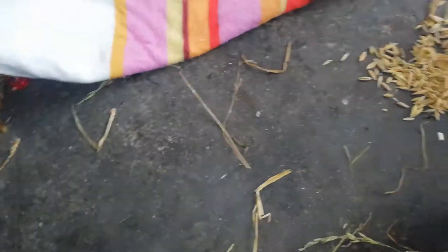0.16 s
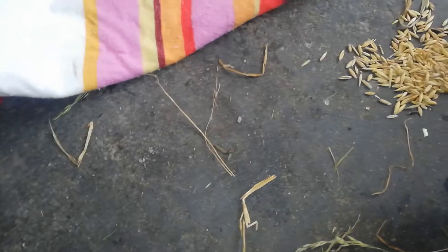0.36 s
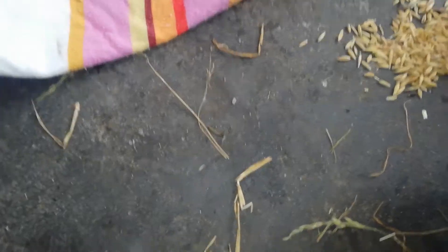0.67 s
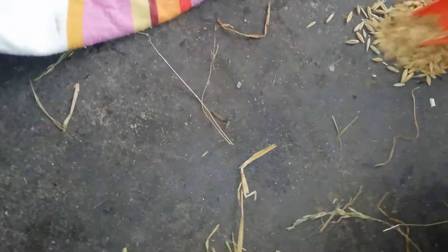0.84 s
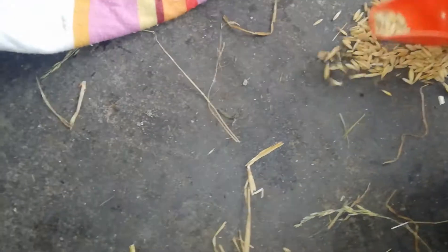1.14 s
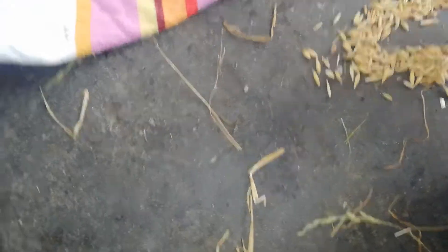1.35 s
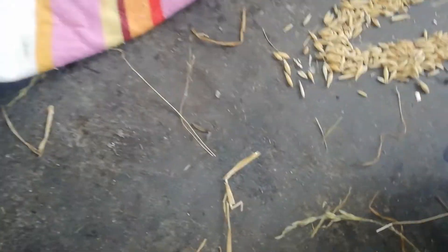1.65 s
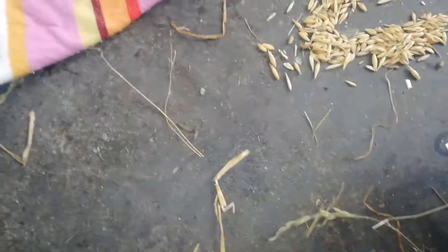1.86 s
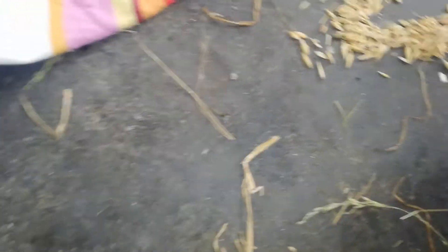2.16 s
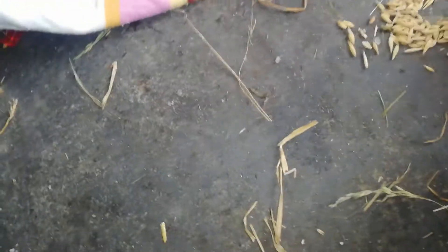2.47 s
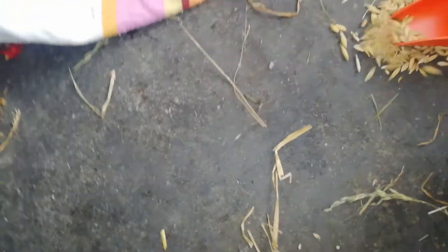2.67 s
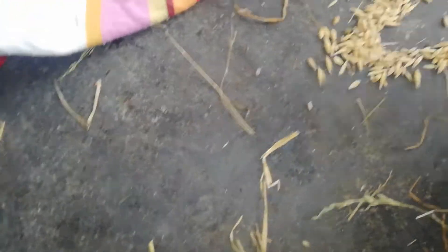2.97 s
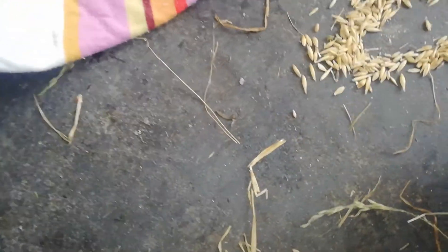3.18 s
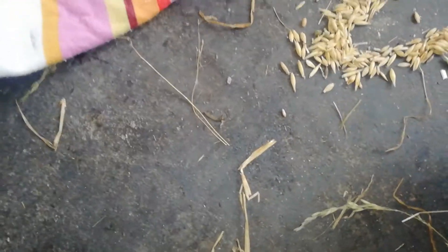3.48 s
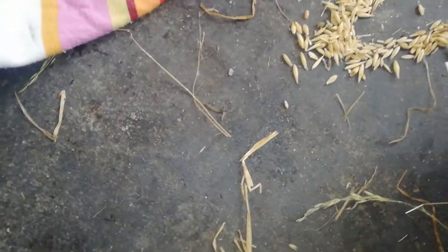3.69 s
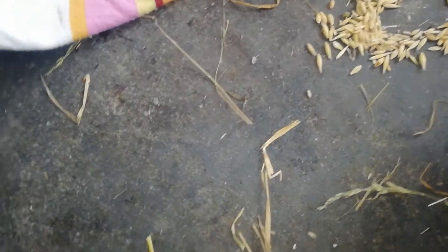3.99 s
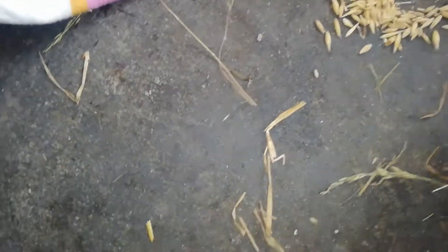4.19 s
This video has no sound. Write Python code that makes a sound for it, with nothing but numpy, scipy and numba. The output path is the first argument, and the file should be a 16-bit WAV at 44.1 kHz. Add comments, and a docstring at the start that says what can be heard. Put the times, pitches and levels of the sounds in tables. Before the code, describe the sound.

Close stereo phone pickup in a small farm shed. A plastic scoop taps the concrete, then drags through spilled grain in a bright, gritty scrape. Husks rustle and single kernels tick and patter down. A shorter, lower-bodied scrape follows, then more rustling, one sharp kernel click, and a cluster of hard hollow knocks near the end. Quiet hiss and faint rumble lie beneath.

```python
"""Scooping spilled grain off concrete

A plastic scoop scrapes spilled grain off a concrete shed floor, close to a phone with two microphone ports.
The rim grinds over grit in two strokes, made of thousands of tiny random contacts given a colour.
Husks rustle against the scoop, kernels tick and fall in two short showers: bursts of the same contacts.
The scoop knocks on the floor with a crack and ringing tones; filtered noise gives a faint tail and a rumble."""
import sys
import numpy as np
from scipy import signal
from scipy.fft import rfft, irfft, next_fast_len
from scipy.io import wavfile
from scipy.ndimage import uniform_filter1d
from numba import njit

SR = 44100
rng = np.random.default_rng(int(sys.argv[2]) if len(sys.argv) > 2 else 0)


def output_pcm(signal):
    """Save a mono or channel-first signal as 16-bit PCM at the path in sys.argv[1].

    Samples are clipped to [-1, 1] before scaling.
    """
    pcm = np.clip(np.atleast_2d(signal).T, -1, 1) * 32767
    wavfile.write(sys.argv[1], SR, np.round(pcm).astype(np.int16))


N = 190875
TIME = np.arange(N) / SR  # seconds

# The rim dragged over concrete, one row a stroke: start [t/s], time to full pressure [t/s], lift [t/s],
# relative level [level/dB], extra treble [level/dB], sag of the pressure [dB/s; negative grows]
STROKES = [(0.596, 0.093, 0.9285, -38, 3.5, 19.5), (2.308, 0.0073, 2.593, -41, 2.5, -2)]
# Grain shifting in and around the scoop, one row a movement: peak [t/s], rise [t/s], fall [t/s],
# relative levels of husks, hollow brushing and floor rubbing [level/dB each],
# left minus right [level/dB], resonance of the scoop [f/Hz]
RUSTLES = [ (0.02, 0.33, 0.33, -50, -55, -55, -2.5, 3400), (0.513, 0.04, 0.04, -56, -72, -75, 0, 3400),
           (0.985, 0.056, 0.26, -40, -54, -55.5, 1, 3400), (1.115, 0.11, 0.047, -44.5, -72, -79, -1, 3400),
           (1.375, 0.16, 0.14, -36.5, -44.5, -54.5, 1, 3430),
           (1.495, 0.22, 0.04, -55.5, -55, -55, -3, 3450),
           (1.755, 0.11, 0.21, -55.5, -53.5, -60.5, -10, 4300),
           (1.87, 0.14, 0.069, -37.5, -55, -68, -8.5, 3960),
           (2.04, 0.066, 0.25, -56.5, -59, -59.5, 0, 4200),
           (2.155, 0.15, 0.14, -51.5, -57, -63.5, -3, 4360), (2.645, 0.1, 0.18, -36.5, -63, -68, 1, 3200),
           (2.775, 0.09, 0.2, -48.5, -61, -74, -1, 3220), (3.092, 0.12, 0.13, -42.5, -42, -78, -7, 3430),
           (3.23, 0.19, 0.14, -49.5, -64, -58, -2.5, 3450), (3.415, 0.25, 0.085, -45, -57, -87, -12, 3400),
           (3.89, 0.25, 0.11, -58.5, -78, -62, -1, 3450), (4.075, 0.045, 0.25, -47, -57, -53, 2, 3460), ]
# Colour of a kernel's click: [f/Hz], [level/dB]
KERNEL = [(240, -76), (400, -41), (1130, -48), (1760, -33), (2800, -28.5), (3070, -29), (5190, -21.5),
          (5690, -20.5), (8240, -6.5), (11200, -23), (12100, -26), (16000, -41.5)]
# How much of the scattered sound differs between the two ports; long waves reach both alike: [f/Hz], [level/dB]
APART = [(450, -12.5), (1100, 0)]


def undb(db):
    """Turn decibels into a plain gain."""
    return 10 ** (np.asarray(db) / 20)


def unit(x):
    """The same sound at rms 1."""
    return x / np.sqrt(np.mean(x ** 2) + 1e-20)


def sides(pan_db):
    """Left and right gains for a level difference."""
    return undb(np.array([pan_db, -pan_db]) / 2).reshape(2, -1)


def add(out, s, x):
    """Mix a short sound in at time s."""
    i = int(s * SR)
    out[:, i:i + x.shape[1]] += x[:, :N - i]


def colour(x, points):
    """Filter through (f/Hz, level/dB) points without sounding early, by way of the cepstrum."""
    n = 2 * next_fast_len(x.shape[-1] // 2 + 1024)
    hz, db = np.transpose(points)
    bins_hz = np.arange(n // 2 + 1) * SR / n
    log_gain = np.log(undb(np.interp(np.log(bins_hz + 1), np.log(hz), db)))
    # folding the cepstrum onto positive times keeps the response from starting before the sound
    cepstrum = irfft(log_gain)[:n // 2] * np.r_[1, np.full(n // 2 - 1, 2)]
    return irfft(rfft(x, n) * np.exp(rfft(cepstrum, n)))[..., :x.shape[-1]]


def through(x, response):
    """Convolve, keeping the length."""
    return signal.fftconvolve(np.atleast_2d(x), response, axes=1)[:, :x.shape[-1]]


def fade(t, t60):
    """Exponential decay, 60 dB down at t60 seconds."""
    return np.exp(-np.log(1000) * t / t60)


def walk(rate):
    """Slow random wander at rms 1, heading for a new value about `rate` times a second."""
    k = int(SR / rate)
    steps = np.repeat(rng.standard_normal(N // k + 1), k)
    return unit(uniform_filter1d(steps, k)[:N])


def wander(x, depth_db, rate):
    """The contact spot moves, so each third of an octave swells and sinks on its own."""
    spectrum = rfft(x, 2 * next_fast_len(N // 2 + 1))
    hz = np.linspace(1, SR / 2, spectrum.shape[1]).clip(125, 16000)
    thirds = 3 * np.log2(hz / 125)
    # neighbouring bands overlap as triangles that add up to the whole sound
    parts = (irfft(spectrum * np.maximum(0, 1 - abs(thirds - k)))[:, :N] for k in range(22))
    return sum(part * undb(depth_db * walk(rate)) for part in parts)


@njit
def resonate(x, hz, width):
    """State-variable band-pass with a moving centre."""
    y, mid, low = np.empty(len(x)), 0., 0.
    for i in range(len(x)):
        g, k = np.tan(np.pi * hz[i] / SR), width / hz[i]
        v = (mid + g * (x[i] - low)) / (1 + g * (g + k))
        mid, low, y[i] = 2 * v - mid, low + 2 * g * v, k * v
    return y


def band(x, hz, width):
    """A steep resonance on both channels, filtered twice; the centre may move."""
    hz, width = hz * np.ones(N), float(width)
    return np.array([resonate(resonate(channel, hz, width), hz, width) for channel in x])


def contact(t60, direct=0.23, size=2048):
    """One brief contact, energy about 1: a sharp tap and its scatter; it reaches the left port a little later."""
    direct = np.clip(direct, 0, 1)  # share of the energy in the tap
    shared, left, right = rng.standard_normal((3, size)) * fade(TIME[:size], t60)
    scatter = unit(shared + colour(np.array([left, right]), APART))
    pair = scatter * np.sqrt((1 - direct) / size)
    pair[:, 0] += np.sqrt(direct)
    lag = rng.integers(8, 26)  # samples
    pair[0] = np.r_[np.zeros(lag), pair[0, :-lag]]
    return pair


def patter(rate, spread_db, t60, count=22):
    """Random tiny contacts, mostly weak and a few strong, at several spots with their own crack; rms 1."""
    strength_db = spread_db * np.minimum(rng.exponential(size=N), 4)
    sizes = undb(strength_db) * rng.choice([-1, 1], N)
    sizes = sizes * (rng.random(N) < rate / SR)  # about `rate` contacts a second
    spot = rng.integers(0, count, N)
    return unit(sum(through(sizes * (spot == k), contact(t60)) for k in range(count)))


def ring(size=8192):
    """The scoop wall's modes as dying sines, energy 1; every blow shares them out differently."""
    # Ringing tones of the wall before random detuning and sharing: [f/Hz], [level/dB], 60 dB decay [t/s]
    wall_modes = [(1285, 3, 0.023), (1300, 13, 0.012), (2230, -15, 0.14), (2695, -33, 0.067),
                  (3200, 2, 0.018), (3400, -1, 0.08), (4570, 0, 0.064), (5370, 19.5, 0.011),
                  (7130, -7.5, 0.23), (7770, -13, 0.034), (8700, -11, 0.044)]
    t = TIME[:size]
    out = 0
    for hz, db, t60 in wall_modes:
        detune, share = rng.standard_normal(2)
        cycles = hz * (1 + 0.0053 * detune) * t + rng.random((2, 1))
        out = out + undb(db + 2 * share) * fade(t, t60) * np.sin(2 * np.pi * cycles)
    return unit(out) / np.sqrt(size)


def air(level_db=-57.5):
    """Quiet background of filtered noise: a rumble common to both ports and a diffuse hiss."""
    # Colour of the background: [f/Hz], [level/dB]
    air_colour = [(13, -25), (22, 8.5), (49, -2), (92, -8), (194, -2.5), (510, -14), (771, -10.5),
                  (1970, -20.5), (3150, -18.5), (6100, -19.5), (8720, -15.5), (14700, -36), (16000, -36)]
    mid, side = rng.standard_normal((2, N))
    side = colour(side, [(60, -17), (150, -8.0), (400, -3.5), (1000, 0.5)])
    noise = unit(colour(mid + side * np.array([[1], [-1]]), air_colour))
    return noise * undb(level_db + 0.09 * walk(21.0))


def shed(x, t60=0.25, wet_db=-13, near_t60=0.062, near_db=-11, size=32768):
    """Quick reflections from the floor and things nearby, then the tail of the walls, as fading noise."""
    # Colour of the shed's answer: [f/Hz], [level/dB]
    echo_colour = [(200, 6.5), (600, 3), (2500, 3), (8000, -3), (11000, -6), (16000, -11)]
    t = TIME[:size]
    mid, side = rng.standard_normal((2, 2, 1, size))
    build_up = 1 - np.exp(-(t / 0.0021) ** 2)
    near, far = (mid + colour(side, APART) * np.array([[1], [-1]])) * build_up
    response = undb(near_db) * unit(near * fade(t, near_t60))
    response = response + undb(wet_db) * unit(far * fade(t, t60))
    return colour(through(x, response / np.sqrt(size)), echo_colour)


def bumps():
    """Dull low swells from handling, alike at both ports: short humps of an unsteady sine."""
    # Soft bumps: middle [t/s], pitch [f/Hz], time from the middle to 1/e [t/s], peak [level/dB]
    handling = [(1.797, 76.8, 0.054, -49), (2.874, 74.5, 0.036, -59.5), (3.873, 117.4, 0.038, -46)]
    out = 0
    for s, hz, length, db in handling:
        hump = np.exp(-((TIME - s) / length) ** 2)
        out = out + undb(db) * hump * np.sin(2 * np.pi * hz * TIME + 0.93 * walk(40))
    return out


def swell(peak, rise, fall):
    """One movement of the grain: it grows and dies away evenly in dB."""
    edge_db = -21.5  # relative to the peak, one rise before it or one fall after it
    return undb(edge_db * np.maximum((peak - TIME) / rise, (TIME - peak) / fall).clip(0, 10))


def movements():
    """Left and right gains of husks, brushing and rubbing; overlapping movements add in power."""
    brush_lead_s = 0.019  # the scoop is brushed a little before the husks slide
    husks = brushing = rubbing = 0
    for peak, rise, fall, husk_db, brush_db, rub_db, pan_db, _ in RUSTLES:
        flow = swell(peak, rise, fall) * sides(pan_db)
        early_flow = swell(peak - brush_lead_s, rise, fall) * sides(pan_db)
        husks = husks + (flow * undb(husk_db)) ** 2
        rubbing = rubbing + (flow * undb(rub_db)) ** 2
        brushing = brushing + (early_flow * undb(brush_db)) ** 2
    return np.sqrt([husks, brushing, rubbing])


def rustle(flicker_db=2.0, shift_db=1.5, brush_db=-3.5, rub_db=0.5, width_hz=480, upper_db=-6):
    """Husks slide over each other, brush the hollow scoop and rub on the floor: dense tiny contacts."""
    # Colour of sliding husks: [f/Hz], [level/dB]
    husk_colour = [(180, -61), (300, -19), (478, -34), (656, -8.5), (946, -30), (1230, -25), (2210, -12),
                   (2930, -9), (3400, -4), (4300, -3.5), (7820, 8), (9090, 7.5), (16000, -26)]
    # Colour of rubbing on the floor: [f/Hz], [level/dB]
    rub_colour = [(200, -7.5), (450, 2.5), (700, 3.5), (950, -1.5), (1250, 0), (2000, -6), (3500, -4.5),
                  (7000, -45)]
    husks, brushing, rubbing = movements()
    grains = patter(rate=2600, spread_db=3.5, t60=0.007)
    slide = patter(rate=3000, spread_db=3.5, t60=0.007)
    grains = wander(grains, shift_db, rate=19)
    # the hollow scoop's resonance glides from one movement to the next, with a weaker one above it
    hz = np.interp(TIME, [row[0] for row in RUSTLES], [row[-1] for row in RUSTLES])
    brush = band(slide, hz, width_hz) + undb(upper_db) * band(slide, 1.78 * hz, width_hz)
    sound = unit(colour(grains, husk_colour)) * husks
    sound += unit(brush) * brushing * undb(brush_db)
    sound += unit(colour(slide, rub_colour)) * rubbing * undb(rub_db)
    return sound * undb(flicker_db * walk(40))


def showers(start_db=-12, end_db=-22):
    """Kernels land together: the level of a patter of contacts climbs fast and then sinks."""
    # Falls of grain: start [t/s], thickest moment [t/s], end [t/s], peak [level/dB], left minus right [level/dB]
    falls = [(1.943, 1.972, 2.02, -18.5, -2.5), (3.504, 3.518, 3.555, -20.5, -2.5)]
    flow = 0
    for start, peak, end, db, pan_db in falls:
        levels_db = [db + start_db, db, db + end_db]
        level_db = np.interp(TIME, [start, peak, end], levels_db, left=-np.inf, right=-np.inf)
        flow = flow + undb(level_db) * sides(pan_db)
    kernels = patter(rate=1300, spread_db=3.0, t60=0.0035)
    return unit(colour(kernels, KERNEL)) * flow


def rebound(crack, loss_db=-7, count=3):
    """A kernel skips a millisecond or two apart: the first skip is as strong as the landing, later ones weaker."""
    gaps = np.cumsum(rng.uniform(0.0007, 0.0024, count))  # seconds after the landing
    out = crack.copy()
    for k, gap in enumerate(gaps):
        lag = int(gap * SR)
        out[:, lag:] += undb(loss_db * k) * crack[:, :-lag]
    return out


def ticks(gain_db=7.5, ring_db=-17, size=8192):
    """Single kernels click, each at the pitch of its size; one pressed against the scoop is duller and rings it."""
    # Kernels that land or snap singly: [t/s], level before the gain [level/dB], left minus right [level/dB],
    # dullness: lift below 5 kHz [level/dB]
    single_kernels = [(0.2836, -33.5, 7, -3), (0.434, -21.5, 4, 12), (0.842, -2.5, -1, 9),
                      (1.4714, -31, -4, 11), (1.8077, -27, -14, 8), (1.8288, -22.5, -17, -0.5),
                      (1.8874, -14, -9, 2), (1.9083, -20, -4, 2), (1.946, -16, -12, 0),
                      (1.9644, -9, -13, 1.5), (2.0213, -13.5, -3, 2), (2.12, -20.5, -5, -2),
                      (2.4152, -11, -7.5, 13), (2.5892, -8.5, 1, 12), (2.7644, -23, -5, -2),
                      (2.8542, -23, 0, 5), (2.8938, -20, -8.5, -9.5), (2.992, -27, 1, 6),
                      (3.062, -20.5, -6, -6), (3.0776, -20, 0, -1), (3.1672, -26, -14, -10),
                      (3.185, -27, -8, -2), (3.5088, -1, -1, -4.5), (4.2212, -19.5, 2, 5),
                      (4.2414, -17.5, 1, 3.5), (4.2969, -8.5, -5.5, -0.5), (4.3224, -16, 6, 2)]
    wall_colour = [(1200, -8), (2800, -15), (3400, 9.5), (6500, 9), (9000, -39)]
    out = np.zeros((2, N))
    for s, db, pan_db, dull_db in single_kernels:
        crack = rebound(contact(t60=0.009, direct=0.25, size=size))
        pitch = 1 + 0.035 * rng.standard_normal()
        crack = colour(crack, [(hz * pitch, level_db) for hz, level_db in KERNEL])
        crack = unit(colour(crack, [(5000, dull_db), (8000, 1), (13000, -0.49)]))
        wall = unit(colour(ring(), wall_colour))
        click = (crack + undb(ring_db + dull_db / 2) * wall) / np.sqrt(size)
        add(out, s, click * undb(db + gain_db) * sides(pan_db))
    return out


def knocks(gain_db=21, ring_db=-9, size=8192):
    """A crack, a short plastic ring and the cup's hollow note; a softer contact has less treble."""
    # Scoop striking the floor: [t/s], level before the gain [level/dB], treble cut-off of the contact [f/Hz],
    # lift of the body below 1.4 kHz [level/dB], cup note against the blow [level/dB], left minus right [level/dB]
    blows = [(0.324, -52, 1190, 20, -30, -7), (0.3565, -22, 8160, 14, -19.5, -7),
             (0.3588, -27, 9000, -0.5, -38, 11), (0.364, -30, 11800, -9, -42, -5),
             (0.8926, -19.5, 8500, -4, -30, -2), (2.3106, -30, 3650, 3.5, -13, -11.5),
             (3.2088, -50, 1120, 20, -29, -19.5), (3.9287, -15, 8000, 1.5, -23, -5),
             (3.9305, -15.5, 8700, 5, -54, -3), (4.0153, -10.5, 11600, -4, -23.5, 0.5),
             (4.0607, -24, 2400, -4, -29, 1), (4.1504, -39, 2790, -3, -35, 1)]
    # Colour of the crack and ring: [f/Hz], [level/dB]
    crack_colour = [(100, -22.5), (170, -10), (300, -23), (600, -14.5), (1000, -16), (1800, -13),
                    (2800, 2.5), (3900, -4.5), (5500, -2), (7000, 3), (8700, 10.5), (12000, -4)]
    out = np.zeros((2, N))
    t = TIME[:size]
    cup_hz, cup_t60 = 572, 0.085  # the scoop's lowest, cup-like mode; decay in seconds
    cup = unit(fade(t, cup_t60) * np.sin(2 * np.pi * cup_hz * t))
    for s, db, cut_hz, body_db, cup_db, pan_db in blows:
        crack = contact(t60=0.009, direct=0.05, size=size)
        blow = colour(crack + undb(ring_db) * ring(), crack_colour)
        blow = colour(blow, [(1400, body_db), (2800, 0)])
        blow = unit(colour(blow, [(cut_hz, 0), (1.33 * cut_hz, -15), (4 * cut_hz, -32)]))
        knock = (blow + undb(cup_db) * cup) / np.sqrt(size)
        add(out, s, knock * undb(db + gain_db) * sides(pan_db))
    return out


def pressure(start, rise, lift, sag_db_per_s):
    """One stroke: the rim is pressed down, sags or grows slowly while it is dragged, and is lifted."""
    lift_db_per_s = 290  # extra decay once the rim is lifted
    attack = np.clip((TIME - start) / rise, 0, 1)
    sag_db = sag_db_per_s * np.maximum(TIME - start - rise, 0)
    lift_db = lift_db_per_s * np.maximum(TIME - lift, 0)
    return attack * undb(-sag_db - lift_db)


def snaps(level_db=-40, dull_db=8):
    """Now and then a kernel snaps out from under the rim, as hard as the rim is pressed."""
    clicks = patter(rate=45, spread_db=3.0, t60=0.009, count=4)
    clicks = colour(colour(clicks, KERNEL), [(5000, dull_db), (8000, 0)])
    pressed = sum(pressure(start, rise, lift, sag) for start, rise, lift, _, _, sag in STROKES)
    return unit(clicks) * undb(level_db) * pressed


def scrape(judder_db=1.57, shift_db=1.55, body_db=3.5, treble_db=1.0):
    """The rim grinds over grit, catching and slipping; kernels pushed ahead of it carry the treble."""
    # Colour of the first stroke: [f/Hz], [level/dB]
    first_colour = [(53, -59), (90, -41), (188, -10), (438, -8.5), (804, -3), (998, -9.5), (1320, -6),
                    (2380, -10.5), (3910, -9), (4360, -12.5), (5300, -4.5), (8530, 3), (10800, -13),
                    (15000, -21), (16000, -27)]
    # Colour of the second stroke: [f/Hz], [level/dB]
    second_colour = [(53, -50), (90, -21), (210, -4.5), (438, -9), (620, -0.5), (977, -5), (1210, -5.5),
                     (1540, -10.5), (3010, -6.5), (3830, -9), (4260, -13), (5300, -8), (8350, 1.5),
                     (11100, -12), (16000, -28)]
    # Broad resonances of the dragged rim: average centre [f/Hz], width of each filter pass [f/Hz],
    # relative level in the first stroke [level/dB], in the second [level/dB]
    rim_modes = [(1286, 490, -15, -18), (3100, 540, -15, -9.5), (5420, 480, -6, -8)]
    pile_db_per_s = 17.5  # kernels pile up ahead of the rim and add treble
    grit = patter(rate=3400, spread_db=3.6, t60=0.006)
    grit = wander(grit * undb(judder_db * walk(110)), shift_db, rate=22)
    rim = [unit(band(grit, hz * (1 + 0.018 * walk(7.9)), width)) for hz, width, *_ in rim_modes]
    low_pass = signal.butter(2, 4000, fs=SR, output="sos")
    out = 0
    for k, spectrum in enumerate([first_colour, second_colour]):
        start, rise, lift, db, bright_db, sag = STROKES[k]
        pile_db = pile_db_per_s * (np.clip(TIME, start, lift) - start)
        rasp = colour(grit, spectrum)
        body = signal.sosfiltfilt(low_pass, rasp)
        treble = unit(rasp - body) * undb(bright_db + pile_db + treble_db)
        rasp = unit(body) * undb(body_db) + treble
        rasp += sum(mode * undb(row[2 + k]) for mode, row in zip(rim, rim_modes))
        out = out + rasp * pressure(start, rise, lift, sag) * undb(db)
    return out


def scene():
    """The work on the floor, its echo in the shed, handling and the quiet background."""
    work = scrape() + snaps() + rustle() + showers() + ticks() + knocks()
    return work + shed(work) + bumps() + air()


def record(dry):
    """Each port has its own colour; the phone widens the low mids, rounds the loudest peaks and cuts the top."""
    # Colour of the left, then the right microphone port: [f/Hz], [level/dB]
    port_colours = [
        [(100, 1), (250, -4), (600, -12.5), (1400, -1.5), (3200, -2.5), (5500, -2.5), (7300, -1), (9000, -5),
         (11000, -5.5), (15000, 3)],
        [(100, 1), (250, -2), (600, -1), (1400, -2), (3200, 0.5), (5500, 0), (7300, -2), (9000, 0),
         (11000, 0.5), (15000, 8.5)],
    ]
    top_hz = 15900
    left, right = (colour(x, port) for x, port in zip(dry, port_colours))
    side = colour((left - right) / 2, [(130, -8.0), (300, -0.5), (620, 6), (1200, 0)])
    heard = (left + right) / 2 + side * np.array([[1], [-1]])
    top_cut = signal.ellip(8, 0.2, 70, top_hz, fs=SR, output="sos")
    return signal.sosfilt(top_cut, np.tanh(heard))


dry = scene()
out = record(dry)
output_pcm(out)
```